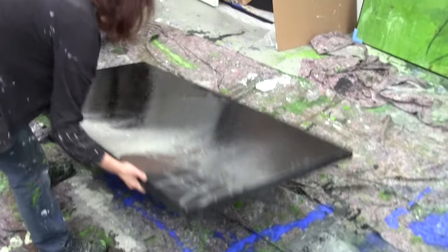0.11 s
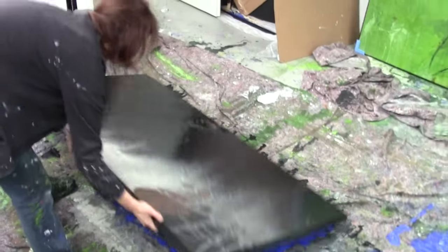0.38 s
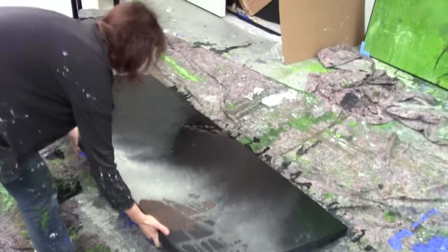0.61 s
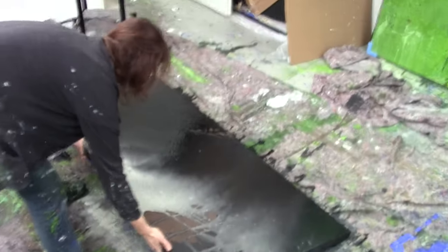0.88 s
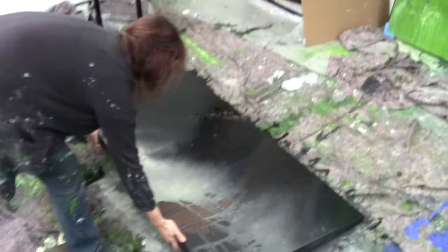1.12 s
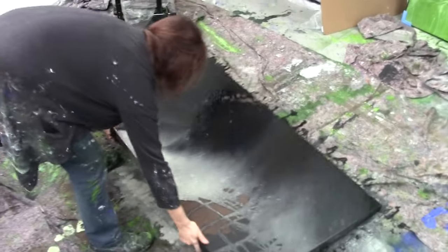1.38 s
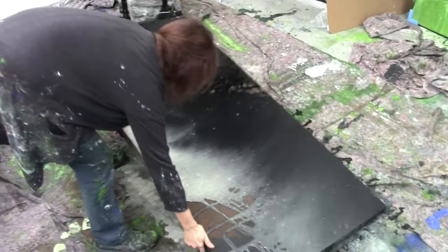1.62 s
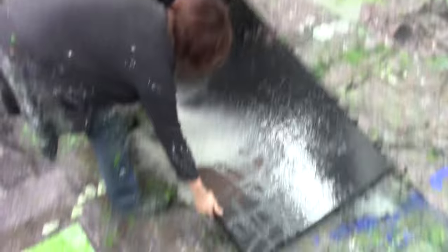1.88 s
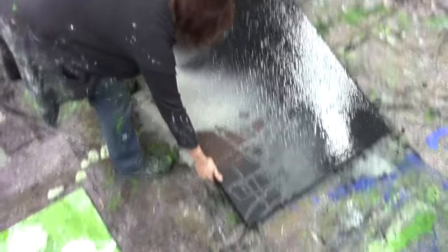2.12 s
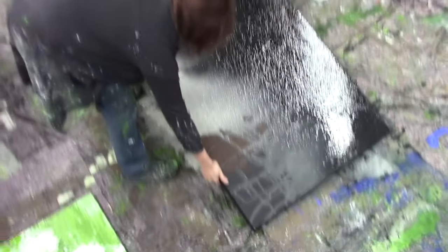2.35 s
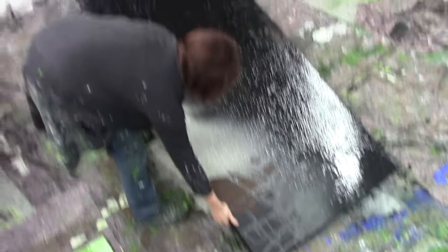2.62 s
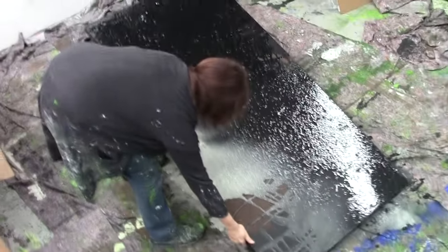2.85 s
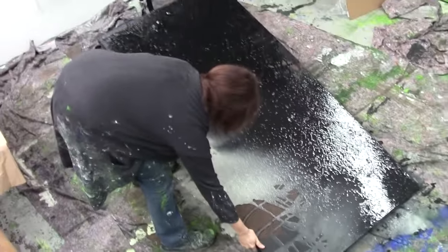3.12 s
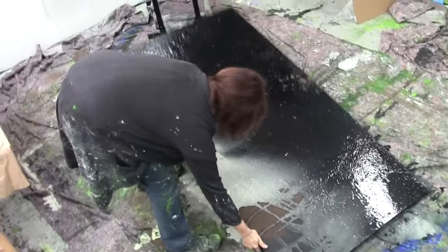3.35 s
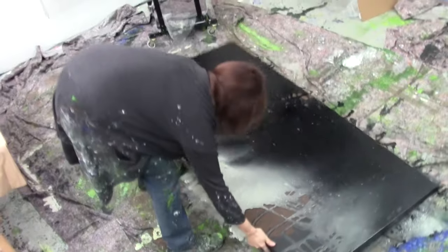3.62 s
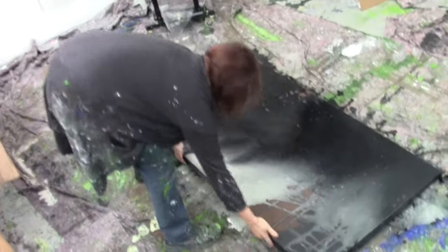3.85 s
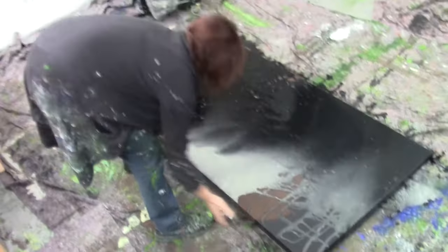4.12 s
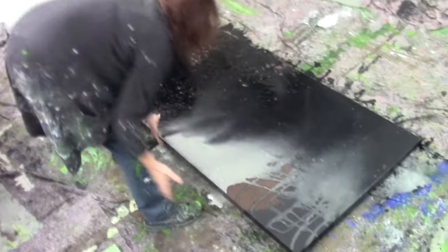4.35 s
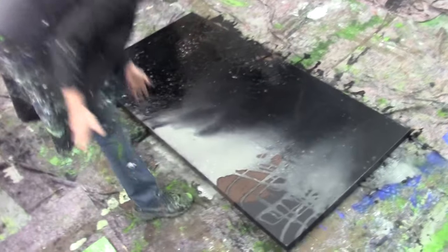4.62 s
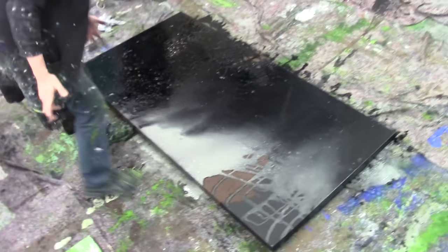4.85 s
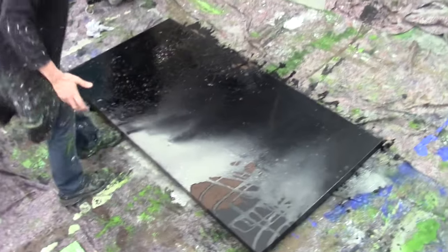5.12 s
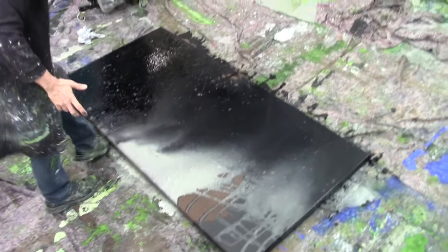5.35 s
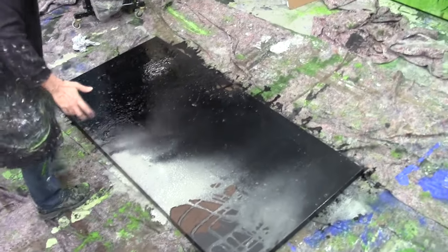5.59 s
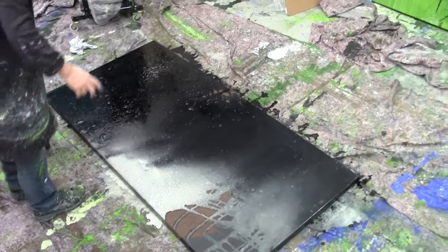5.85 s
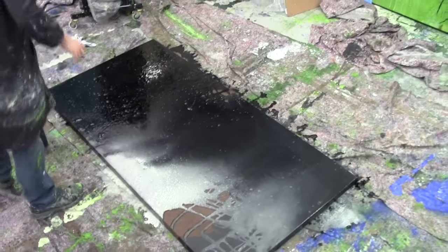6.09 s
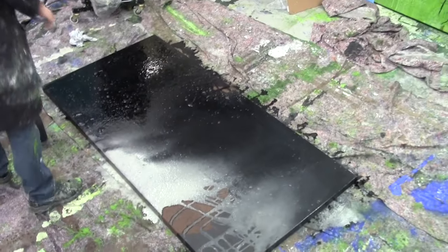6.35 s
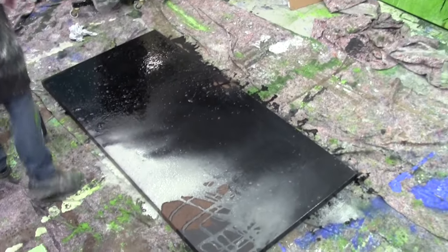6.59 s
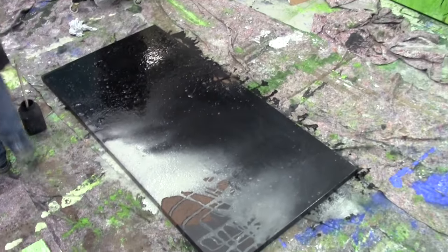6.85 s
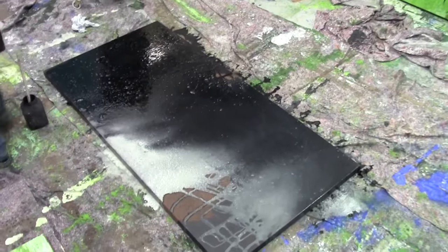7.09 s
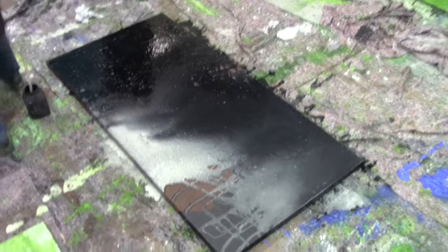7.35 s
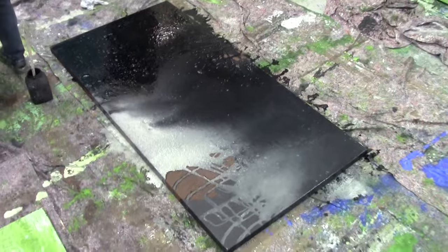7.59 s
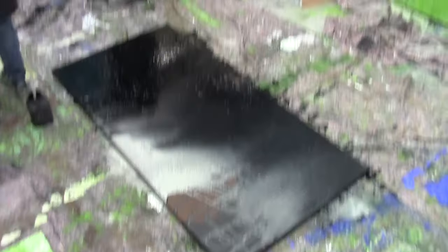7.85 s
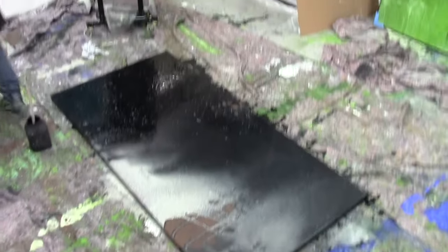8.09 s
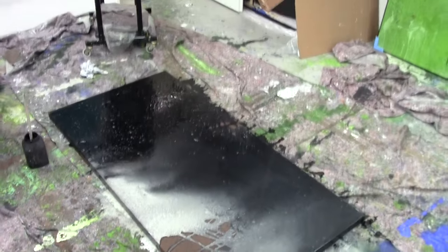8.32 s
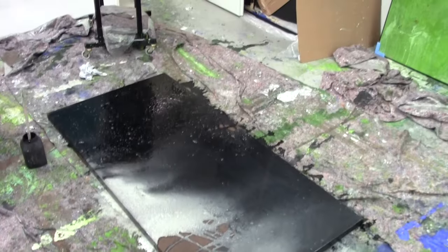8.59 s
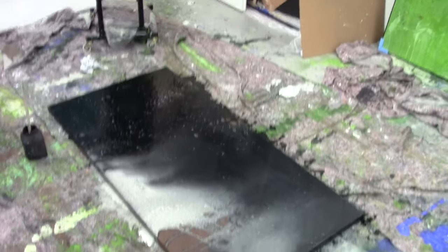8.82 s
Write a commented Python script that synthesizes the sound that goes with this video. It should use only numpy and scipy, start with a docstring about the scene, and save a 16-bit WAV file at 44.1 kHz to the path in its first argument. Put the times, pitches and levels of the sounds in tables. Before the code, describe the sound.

A large wooden panel thumps down in a tight cluster of hollow booming knocks, then again later, with dry ticks and cloth scuffs in a studio.

```python
"""A large wooden panel is set down on its edge, tilted and laid flat on a cloth-covered studio floor.
Room hiss comes first, then a cluster of blows near 0.5 s; each blow rings panel modes and slaps the edge.
Floor boards hum after it while close ticks (decaying rings with a snap) and soft thuds follow from 1.4 s.
The loudest blows come near 3.8 s and a softer group near 5.5 s, each ringing on in the room.
Shoes scuff and step on the cloth, made of noise grains, to the end; ticks snap until 7.5 s."""
import sys
import numpy as np
from scipy import signal
from scipy.fft import rfft, irfft
from scipy.io import wavfile
from scipy.ndimage import uniform_filter1d

SR = 44100
rng = np.random.default_rng(int(sys.argv[2]) if len(sys.argv) > 2 else 0)


def generate_wav(signal):
    """Clip the signal to [-1, 1] and save it as 16-bit WAV at the path in sys.argv[1]."""
    frames = np.transpose(np.atleast_2d(signal))
    scaled = np.clip(frames, -1, 1) * 32767
    pcm = np.round(scaled).astype(np.int16)
    wavfile.write(sys.argv[1], SR, pcm)


def voltage_ratio(decibels):
    """Convert decibels (scalar or array-like) to amplitude ratios, 20 dB per decade."""
    exponent = np.asarray(decibels, float) / 20
    return 10 ** exponent


N = 395136  # samples, about 9 s
T = np.arange(N) / SR  # s


def shape(x, points):
    """Colour by (Hz, dB) points joined on a log frequency axis."""
    hz, db = np.transpose(points)
    f = np.maximum(np.arange(x.shape[-1] // 2 + 1) * SR / x.shape[-1], 1)
    gain = voltage_ratio(np.interp(np.log(f), np.log(hz), db))
    return irfft(rfft(x) * gain, x.shape[-1])


def level(x, db):
    """Set the rms in dB."""
    return x * voltage_ratio(db) / np.sqrt(np.mean(x ** 2))


def band(x, lo_hz, hi_hz):
    """Gentle band-pass."""
    sos = signal.butter(2, [lo_hz, min(hi_hz, 0.45 * SR)], "band", fs=SR, output="sos")
    return signal.sosfilt(sos, x)


def ring(t, hz, t60):
    """One decaying mode; t60 is the time in s to fall 60 dB."""
    return np.sin(2 * np.pi * hz * t) * np.exp(-np.log(1000) * t / t60)


def add(out, s, x):
    """Mix x in at time s."""
    i = int(s * SR)
    out[i:i + len(x)] += x[:N - i]


def walk(rate):
    """Random levels, rate of them a second, slewed twice into a smooth wander."""
    hold = int(SR / rate)
    steps = np.repeat(rng.standard_normal(N // hold + 1), hold)
    return 0.42 * uniform_filter1d(uniform_filter1d(steps, hold), hold)[:N]


# Modes of the panel. Each row: nominal frequency in Hz, relative level in dB, t60 in s.
PANEL_MODES = [(155.5, -3, 0.53), (171.8, -3, 0.7), (199.6, -5, 0.6), (224.4, -4, 0.39), (268.3, 1.5, 0.13),
               (308, 2.5, 0.091), (352, -9, 0.075), (362.7, 1, 0.083), (396.5, -3.5, 0.16),
               (419.2, -6, 0.19), (461, -8.5, 0.12), (489, -5, 0.068), (551, 1.5, 0.11), (624, -3.5, 0.081),
               (703, -0.5, 0.053), (778, -10, 0.049)]


def panel_modes(s, body_hz, detune, uneven, flex):
    """Modes near the one favoured by the place of the blow answer most, some in opposite sign."""
    t, total = T[:SR], 0
    held = int(s * SR) + np.arange(SR)
    for k, (hz, mode_db, t60) in enumerate(PANEL_MODES):
        octaves = np.log2(hz / body_hz)
        favour_db = 7.7 * np.exp(-(octaves / 0.24) ** 2) - 1.5 * octaves ** 2
        gain = voltage_ratio(mode_db + 2.1 * uneven[k] + favour_db) * (-1) ** (k // 2)
        build_up = np.minimum(t * hz / 1.54, 1)  # bending waves need a cycle or so
        tone = ring(t, hz * (1 + 0.01 * detune[k]), t60)
        total = total + gain * tone * build_up * np.take(flex[k], held, mode="wrap")
    return total


# Panel blows on the floor, and softer thuds of feet beside it. Each row: start in seconds,
# relative blow level in dB, relative rattle level in dB, rattle frequency in Hz, favoured mode in Hz.
BLOWS = [(0.5199, -14, -51, 2260, 186), (0.532, -8.5, -32, 2250, 169), (0.545, -15.5, -36, 1510, 530),
         (0.561, -17, -40, 2670, 173), (0.59, -10.5, -36.5, 900, 198), (0.6204, -18, -36, 2400, 201),
         (0.628, -23.5, -33, 1500, 420), (0.648, -23.5, -59, 1410, 365), (2.157, -40, -44, 2010, 420),
         (2.168, -36, -41.5, 1370, 229), (2.199, -36, -44, 830, 463), (3.7513, -2.5, -31, 820, 262),
         (3.783, -6.5, -32.5, 1500, 225), (3.804, -34, -24.5, 3100, 360), (3.811, -27, -30, 1790, 483),
         (3.82, -6.5, -37, 2370, 232), (3.834, -24, -30, 1540, 300), (3.855, -29, -33, 2520, 230),
         (4.44, -37.5, -81, 1510, 188), (4.47, -40.5, -71, 1500, 188), (5.03, -40.5, -64, 1500, 177),
         (5.472, -32, -31.5, 890, 778), (5.486, -30, -32, 1150, 497), (5.501, -23, -37.5, 1040, 347),
         (5.511, -23, -55, 890, 176), (5.529, -20.5, -51, 910, 246), (5.548, -24.5, -38, 870, 350),
         (5.578, -26, -63, 607, 347), (7.029, -44, -71, 1000, 170), (8.11, -36, -44, 584, 440),
         (8.139, -40, -65, 600, 176), (8.88, -35, -50, 1000, 151), (8.928, -33, -67, 1000, 302)]
# Colour of the rattling edge. Each row: frequency in Hz, relative density in dB per Hz.
RATTLE_COLOUR = [(300, 0.5), (600, 4), (1500, -3), (2500, -11), (3500, -20), (5500, -27.5), (9000, -33.5),
                 (15000, -39)]
CONTACT_CYCLES = 0.43  # a contact lasts about this share of the favoured mode's cycle


def blows():
    """A soft push rings the panel; the loose edge slaps and rattles briefly."""
    panel, edge = np.zeros(N), np.zeros(N)
    rattle = shape(rng.standard_normal(N) * voltage_ratio(4 * walk(400)), RATTLE_COLOUR)
    chance = rng.standard_normal((len(BLOWS), 2, len(PANEL_MODES)))  # no two blows bend the panel alike
    # the held panel sags and rocks, so each mode swells and dips
    flex = voltage_ratio(9 * np.array([walk(22) for _ in PANEL_MODES]))
    for (s, db, rattle_db, rattle_hz, body_hz), (detune, uneven) in zip(BLOWS, chance):
        push = np.hanning(int(CONTACT_CYCLES * SR / body_hz) + 2)
        modes = panel_modes(s, body_hz, detune, uneven, flex)
        struck = np.convolve(modes, push / push.sum()) / np.abs(modes).max()
        add(panel, s, voltage_ratio(db) * struck)

        wide = level(rattle[int(s * SR):][:SR // 4], 0)
        core = level(band(wide, 0.81 * rattle_hz, 1.33 * rattle_hz), 0)
        slap = core + 2.0 * band(wide, 170, 5.1 * rattle_hz)  # duller slaps carry less treble
        t = T[:len(slap)]
        envelope = np.exp(-t / 0.0095) * np.minimum(t * rattle_hz / 3.3, 1)
        add(edge, s, voltage_ratio(rattle_db) * slap * envelope)
    return panel, edge


# Close pair of floor modes that throbs. Each row: frequency in Hz, relative level in dB, t60 in s, sign.
FLOOR_MODES = [(36.2, 0, 3.4, 1), (39.27, 0, 3.2, -1)]
# Weight landing on the boards. Each row: start in seconds, relative levels of throb, joist and boom
# in dB, share of the upper floor mode (negative where the place reverses it).
LANDINGS = [(0.525, -29, -42, -26.5, 0.44), (2.164, -51, -54.5, -58, 0.41), (3.757, -37, -36, -32.5, 0.92),
            (5.469, -41.5, -39.5, -39, -0.25)]


def boards():
    """The floor hums on long after each landing; a wavering joist and boom answer higher up."""
    out, t = np.zeros(N), T[:4 * SR]
    for s, throb_db, joist_db, boom_db, upper in LANDINGS:
        throb = 0
        for (hz, mode_db, t60, sign), share in zip(FLOOR_MODES, (1, upper)):
            throb = throb + sign * voltage_ratio(mode_db) * share * ring(t, hz, t60)
        boom = ring(t, 125.0, 1.33) + 0.85 * ring(t, 114.0, 1.35)
        boom = boom * np.minimum(t / 0.03, 1) * voltage_ratio(7 * walk(11.1)[:len(t)])
        joist = ring(t, 68.0, 1.78) * voltage_ratio(10 * walk(10)[:len(t)])
        answer = voltage_ratio(throb_db) * throb + voltage_ratio(boom_db) * boom + voltage_ratio(joist_db) * joist
        add(out, s, answer * np.minimum(t / 0.011, 1))
    return out


# Shoes and sleeves on cloth. Each row: peak time in seconds, swell in seconds, fade in seconds,
# relative level in dB, brightness in dB; swell and fade each cover 20 dB.
SCUFFS = [(0.41, 0.045, 0.074, -61, 1), (0.521, 0.024, 0.18, -44, 3.5), (1.12, 0.22, 0.46, -60, -2),
          (1.418, 0.085, 0.17, -52.5, 5), (1.7, 0.26, 0.68, -61.5, 2.5), (3.25, 0.05, 0.22, -65.5, 4),
          (3.76, 0.02, 0.11, -42.5, -2), (4.21, 0.04, 0.056, -65, 8), (4.37, 0.064, 0.092, -68.5, 20),
          (4.75, 0.63, 0.42, -54.5, 0), (5.006, 0.017, 0.026, -45, 8.5), (5.035, 0.064, 0.17, -47.5, -4.5),
          (5.331, 0.21, 0.32, -46, 0), (5.417, 0.12, 0.084, -35.5, -5), (5.478, 0.0089, 0.062, -35, -1),
          (5.677, 0.036, 0.1, -49.5, -1.5), (6.31, 0.11, 0.15, -57.5, 6.5), (6.42, 0.072, 0.97, -60, -1),
          (6.689, 0.011, 0.11, -49.5, 0), (6.98, 0.041, .05, -59, -3), (7.028, 0.083, 0.14, -43.5, -1.5),
          (7.184, 0.0068, 0.075, -48, -0.5), (7.241, 0.035, 0.092, -50.5, 0),
          (7.35, 0.092, 0.28, -49.5, -1.5), (7.55, 0.26, 0.3, -54, -3), (7.97, 0.038, 0.12, -46, -7),
          (8.04, 0.11, 0.17, -46.5, 5), (8.29, 0.28, 0.2, -54.5, -4), (8.6, 0.031, 0.57, -50, -1.5),
          (8.71, 0.12, 0.2, -55, 13), (8.8, 0.17, 0.17, -59, -8), (8.94, 0.26, 0.42, -40.5, -1.5)]
# Colours of the cloth's body, grit and hiss, in that order.
# Each row of a colour: frequency in Hz, relative density in dB per Hz.
CLOTH_COLOURS = [
    [(90, -14), (220, 11.5), (900, 10.5), (2000, -41), (6000, -86)],
    [(400, -41), (1200, -0.5), (2500, -1), (4500, -12), (9000, -32.5)],
    [(2000, -2), (4800, -2.5), (8000, -2), (12000, -11.5), (15500, -21)],
]
BODY_DB, TREBLE_DB = -5.5, -2.5  # cloth body and hiss against the grit in a scuff of neutral brightness


def scuffs():
    """Dense grains of uneven size as soles drag over stiff painted cloth; bright scuffs trade body for hiss."""
    big = (rng.random(N) < 0.012) * voltage_ratio(np.minimum(5.0 * rng.exponential(size=N), 14))
    grains = rng.standard_normal(N) * (1 + 1.34 * big)
    layers = [level(shape(grains, colour) * voltage_ratio(5 * walk(80)), 0) for colour in CLOTH_COLOURS]
    power = np.zeros((3, N))  # overlapping scuffs add in power
    for s, swell, fade, db, bright_db in SCUFFS:
        span = slice(max(int((s - 2 * swell) * SR), 0), int((s + 2 * fade) * SR))
        t = T[span] - s
        press = voltage_ratio(db - 20 * np.where(t < 0, -t / swell, t / fade))
        balance = voltage_ratio(np.array([[BODY_DB - bright_db], [0], [TREBLE_DB + bright_db]]))
        power[:, span] += (press * balance) ** 2
    return np.sum(np.sqrt(power) * layers, axis=0)


# Scrapes that sing in one band. Each row: start in seconds, length in seconds, centre in Hz,
# width in Hz, relative level in dB.
SCRAPES = [(1.755, 0.46, 1770, 400, -58.5), (4.328, 0.17, 4200, 1200, -53.5), (4.479, 0.65, 3270, 260, -61),
           (5.354, 0.18, 626, 120, -36.5), (5.386, 0.11, 330, 129, -34.5), (5.398, 0.031, 2700, 600, -43),
           (6.966, 0.12, 706, 298, -49.5), (7.238, 0.065, 3630, 500, -49), (7.24, 0.12, 2430, 500, -51),
           (8.002, 0.27, 626, 497, -47.5)]


def scrapes():
    """Rough rubbing that catches and slips, heard through one resonance."""
    out, catch = np.zeros(N), voltage_ratio(7 * walk(130))
    t = T[:SR // 2]
    for s, length, hz, width_hz, db in SCRAPES:
        rub = band(rng.standard_normal(SR // 2), hz - width_hz / 2, hz + width_hz / 2)
        envelope = np.clip(np.minimum(t / 0.005, (length - t) / (0.86 * length)), 0, 1)
        add(out, s, level(rub, db) * envelope)
    return out * catch


# Dry ticks close by. Each row: start in seconds, relative ring level in dB, ring frequency in Hz,
# ring t60 in s, relative snap level in dB, snap frequency in Hz.
TICKS = [(1.418, -31, 2050, 0.021, -32.5, 3530), (1.6166, -23, 1740, 0.011, -34, 3530),
         (1.8673, -50, 1700, 0.01, -42, 9500), (1.871, -12.5, 1720, 0.017, -31, 7000),
         (2.5279, -8.5, 1890, 0.0072, -41.5, 3800), (4.355, -34.5, 1714, 0.015, -71, 4500),
         (5.001, -36.5, 2100, 0.018, -41, 6000), (6.692, -21.5, 1910, 0.0087, -55, 3500),
         (7.179, -31, 2000, 0.014, -37.5, 4500), (7.2372, -30.5, 2400, 0.015, -40.5, 4000),
         (7.5087, -28.5, 1840, 0.0086, -58, 3500)]


def ticks():
    """A short pair of rings inside a dry knock, a bright snap, and a faint echo off the floor."""
    out, t = np.zeros(N), T[:SR // 10]
    for s, db, hz, t60, snap_db, snap_hz in TICKS:
        noise = band(rng.standard_normal(len(t)), 0.59 * snap_hz, 1.32 * snap_hz)
        snap = level(noise, snap_db) * np.exp(-t / 0.0024)
        knock = 0.86 * ring(t, 0.83 * hz, 0.0037) + 0.19 * ring(t, 1.68 * hz, 0.0049)
        pair = 0.58 * ring(t, hz, t60) + 0.2 * ring(t, 1.14 * hz, t60)
        tick = (voltage_ratio(db) * (pair + knock) + snap) * np.minimum(t / 0.0011, 1)
        add(out, s, tick)
        add(out, s + 0.0063, voltage_ratio(-15.5) * tick)
    return out


# Decay of the room. Each row: frequency in Hz, t60 in s.
ROOM_T60 = [(100, 1), (250, 0.79), (600, 0.56), (1500, 0.57), (4000, 0.46), (10000, 0.34)]
# How far the two microphones differ. Each row: frequency in Hz, side against mid in dB.
ROOM_SIDE_DB = [(60, -59), (250, -29), (700, -20), (2000, -20.5), (5000, -14), (12000, -10)]


def room(x):
    """Dense echoes that mostly die faster in the treble; the two microphones differ more towards the top."""
    t, tail = T[:SR], 0
    hz, t60 = np.transpose(ROOM_T60)
    for f in 60 * 2 ** np.arange(8.0):  # octave bands
        decay = np.exp(-np.log(1000) * t / np.interp(np.log(f), np.log(hz), t60))
        tail = tail + band(rng.standard_normal((2, SR)), f / np.sqrt(2), f * np.sqrt(2)) * decay
    tail = tail * np.minimum(t / 0.011, 1) / np.sqrt(np.sum(tail[0] ** 2))
    # high-pass the send: echoes answer mainly above 250 Hz; the mode tables carry the bass ring
    x = band(band(x, 246, 24000), 196, 24000)
    mid, side = signal.fftconvolve(x[None], tail, axes=1)[:, :N]
    return mid, shape(side, ROOM_SIDE_DB)


# Colour of the room tone. Each row: frequency in Hz, relative density in dB per Hz.
HISS_COLOUR = [(20, -3), (40, -2), (65, 0), (95, -7), (200, -0.5), (320, -7), (700, -11.5), (1500, -14.5),
               (3000, -16.5), (6000, -21), (10000, -26), (15500, -33.5)]
# Width of the room tone at the microphones. Each row: frequency in Hz, side against mid in dB.
HISS_SIDE_DB = [(60, -12), (110, -5.5), (200, -7), (380, -0.5), (700, -1.5), (1290, -5), (2380, -8),
                (4400, -8.5), (8120, -8), (15000, -3)]


def hiss():
    """Room tone: a low rumble and a smooth hiss that waver slightly."""
    mid, side = shape(rng.standard_normal((2, N)), HISS_COLOUR)
    waver_db = 0.8 * walk(3)
    gain = voltage_ratio(-55.5 + waver_db) / np.sqrt(np.mean(mid ** 2))
    return gain * mid, gain * shape(side, HISS_SIDE_DB)


def scene():
    """Blows and foot thuds fill the room, scuffs and scrapes less so, close ticks hardly."""
    (panel, edge), floor = blows(), boards()
    tick, scuff = ticks(), scuffs() + scrapes()
    to_room = voltage_ratio(-2.5) * panel + voltage_ratio(-3) * edge + voltage_ratio(-12.0) * scuff + voltage_ratio(-52) * tick
    wet_mid, wet_side = room(to_room)
    hiss_mid, hiss_side = hiss()
    mid = panel + edge + floor + tick + voltage_ratio(-3.5) * scuff + wet_mid + hiss_mid
    scuff_side = voltage_ratio(-4.5) * shape(np.roll(scuff, 300), ROOM_SIDE_DB)  # 300 samples late
    side = wet_side + hiss_side + 0.053 * (mid - floor) + scuff_side  # all but the floor sits a little left
    return np.array([mid + side, mid - side])


def top_cut(x):
    """Nothing passes above the cut-off."""
    return signal.sosfilt(signal.butter(12, 15800, fs=SR, output="sos"), x)


def record(dry):
    """The recorder rounds the loudest peaks."""
    mix = np.tanh(0.84 * dry) / 0.75
    return top_cut(mix)


dry = scene()
out = record(dry)
generate_wav(out)
```